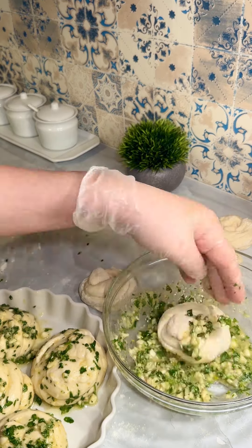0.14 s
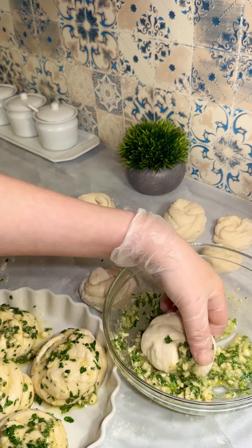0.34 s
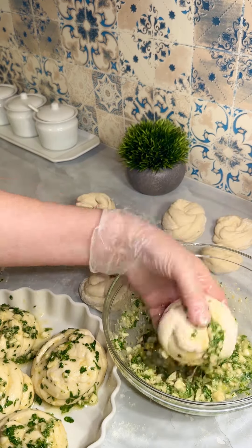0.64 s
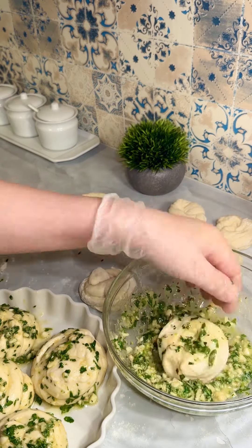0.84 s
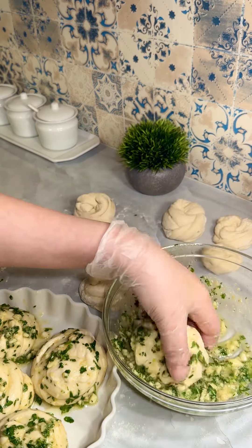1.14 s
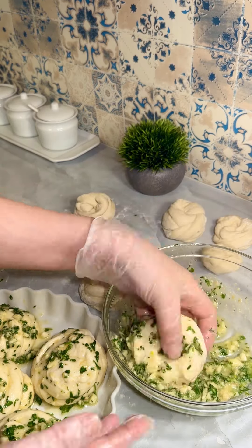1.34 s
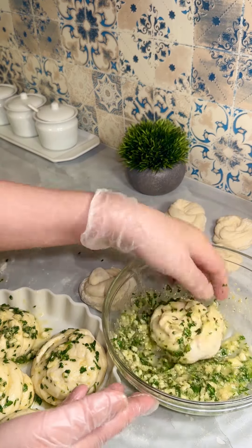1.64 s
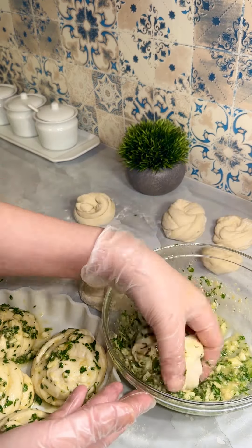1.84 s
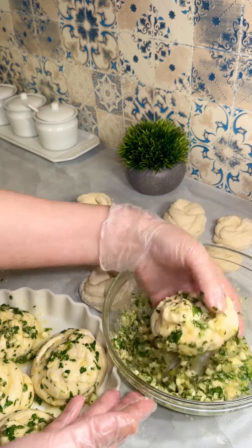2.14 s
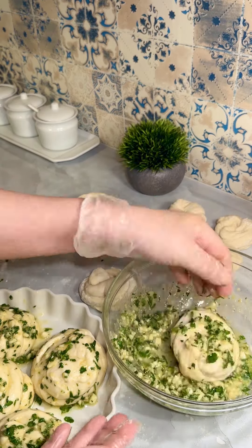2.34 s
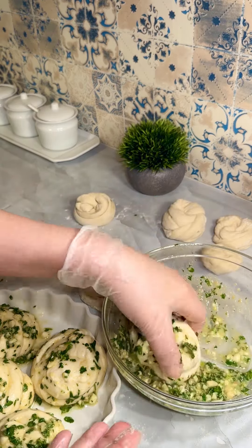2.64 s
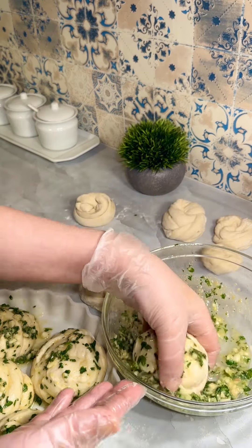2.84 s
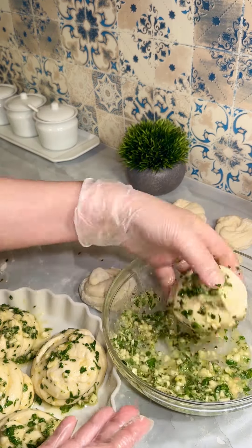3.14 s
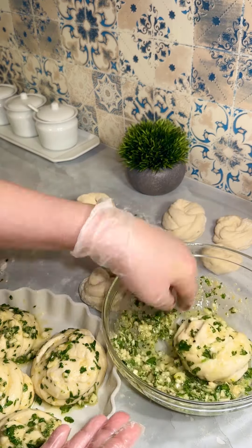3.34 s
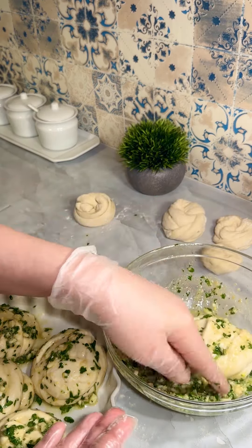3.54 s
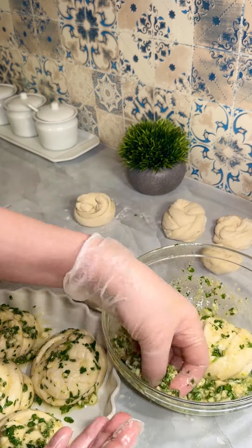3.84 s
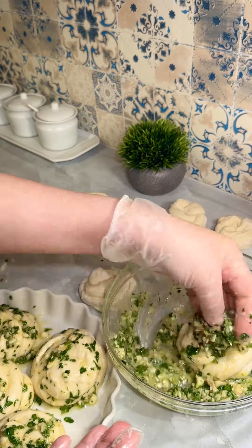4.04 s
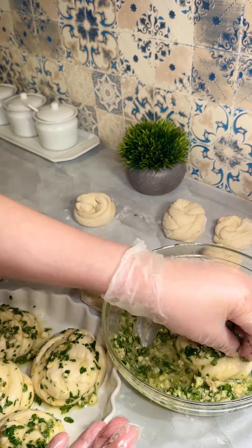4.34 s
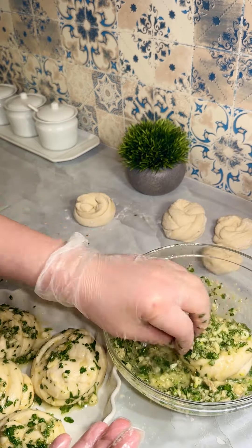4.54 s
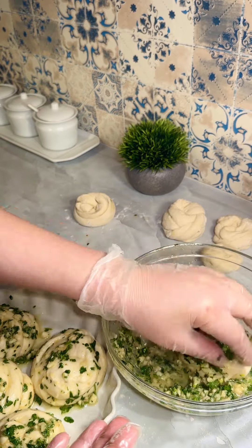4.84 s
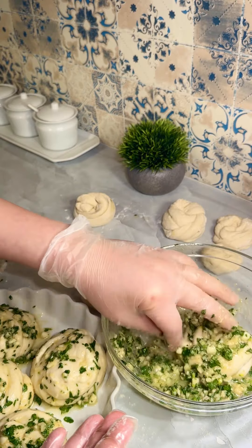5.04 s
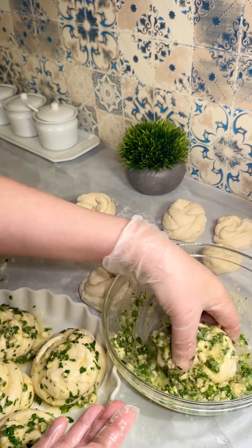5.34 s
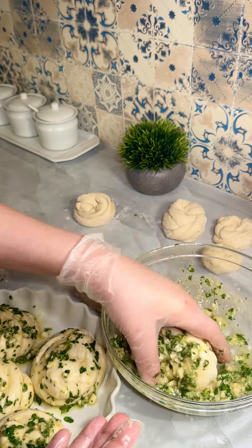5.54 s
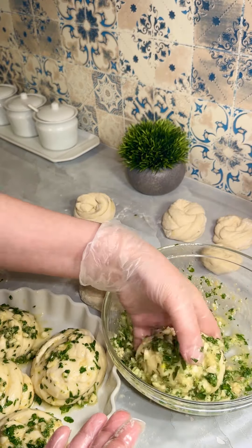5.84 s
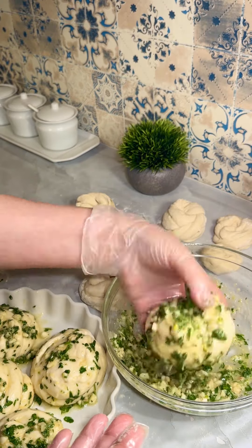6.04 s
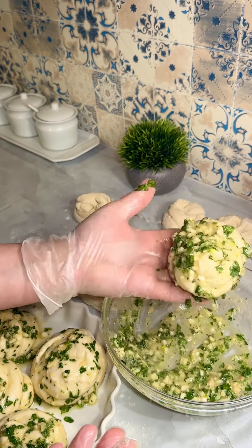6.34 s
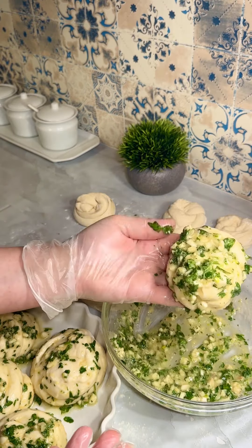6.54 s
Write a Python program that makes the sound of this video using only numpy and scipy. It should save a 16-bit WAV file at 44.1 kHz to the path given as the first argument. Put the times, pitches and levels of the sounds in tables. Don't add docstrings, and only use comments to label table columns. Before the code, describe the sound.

Close stereo sound in a quiet kitchen with very short reflections. From 0 s a thin glove rustles over fine wet crackle, a brief drag brushes the glass, and soft low thuds land around 0.3 s. Small oily snaps and ticks scatter throughout. A brighter crack comes at 0.8 s, then a dull touch and a thick smear near 1 s. Hollow knocks at 1.4 s lead into a sharp hissing air spit, and a hard wet slap cracks at 1.55 s. Another, longer spit comes at 2 s as the faint engine outside drones higher beneath the fridge hum. Strong slaps follow at 2.3 and 3.2 s. Activity then softens into squelchy presses, with a low smear near 4 s and long drags from 4.4 s. A knuckle raps the glass bowl at 5 s with a tiny bounce. Folds flick near 5.5 s, a last wet drag passes around 6 s, and sparse ticks and light brushing fade toward 6.7 s.

```python
import sys
import numpy as np
from scipy import signal
from scipy.fft import rfft, irfft, next_fast_len
from scipy.io import wavfile

SR = 44100
rng = np.random.default_rng(int(sys.argv[2]) if len(sys.argv) > 2 else 0)


def store_pcm(level_fs):
    pcm = np.round(np.clip(level_fs, -1, 1) * 32767).astype(np.int16)
    wavfile.write(sys.argv[1], SR, np.atleast_2d(pcm).T)


def boost_factor(decibels):
    exponent = np.asarray(decibels, float) / 20
    return 10 ** exponent


N = 295911

# frequency in Hz, lead of the left in radians, left minus right in dB.
PORT_DIFFERENCES = [(157, -0.16, 0), (503, 0.21, 0), (954, 1.03, 0.5), (1480, -1.4, 1.5), (1800, 0.37, 0),
                    (3400, 0.75, -0.2), (4810, 1.0, 0), (5650, 0.9, 2), (7000, 0.6, 0.3), (9500, 0.1, 1),
                    (12700, -1.25, 0), (15500, -2, 1)]
# frequency in Hz, correlation from -1 to 1.
LEFT_RIGHT_LIKENESS = [(60, 0.97), (290, 1), (640, 0.4), (1410, -1.03), (2300, 0.32), (3400, 0.8),
                       (4900, 0.77), (7000, 0.99), (9500, 0.47), (15000, 0.72)]

# frequency in Hz, density in dB per Hz.
RUMBLE_SPECTRUM = [(18, -80), (30, -51), (64, -19.5), (160, -13.5), (184, -12), (204, -11), (220, -27),
                   (300, -29.5), (390, -74), (660, -120)]
# time in seconds, level in dB.
RUMBLE_LEVELS = [(0.0, -69.5), (1.08, -66), (1.4, -69.5), (1.61, -61), (2.07, -69.5), (2.34, -62.5),
                 (4.22, -64), (4.39, -66), (6.71, -67)]
# frequency in Hz, level in dB, waver in dB.
FRIDGE_TONES = [(192.1, 1, 1.25), (111.7, -20, 3.5), (212, -15.5, 3), (647.5, -20, 2.5)]
# time in seconds, firing tone in Hz, level in dB.
ENGINE_COURSE = [(0, 44.1, -71), (1.85, 45.2, -99), (2.05, 57.4, -58), (2.6, 56.94, -57),
                 (3.3, 57.5, -55.5), (3.75, 55.45, -63.5), (4.0, 54.8, -54), (4.33, 57.8, -58),
                 (4.4, 61.3, -71.5), (4.65, 73.6, -62), (4.85, 82.4, -70.5), (5.0, 77.4, -99),
                 (5.5, 74.6, -85), (5.75, 76.4, -72.5), (6.71, 79.4, -74.5)]
# multiple of the firing tone, level in dB.
FIRING_ORDERS = [(1, -1), (2.0, -14.5), (2.5, -9)]

# peak in seconds, length in seconds, ringing in dB.
GLASS_RUBS = [
    (0.096, .07, -71),
    (2.218, 0.051, -70),
    (4.562, 0.08, -72),
    (5.012, 0.042, -61),
    (5.203, 0.023, -77),
    (5.544, 0.071, -79),
]
# frequency in Hz, level in dB.
GLASS_MODES = [(4107, 0), (6245, -16), (8839, -12), (7300, -14), (11601, -9), (14637, -18)]
# start in seconds, peak in dB, contact cut-off
# in Hz.
KNUCKLE_RAPS = [
    (5.029, -27, 1500),
    (5.0337, -32, 900),
    (5.057, -50, 700),
    (5.079, -53, 700),
    (.934, -46.5, 400),
    (1.0, -44.5, 600),
    (1.022, -57, 900),
]
# frequency in Hz, level in dB, 60 dB decay in seconds.
BOWL_MODES = [(400, -1.5, 0.09), (576, 4.5, 0.059), (632, 9, 0.038), (851, 1.5, 0.05), (1080, -5.5, 0.034),
              (1243, -9.5, 0.063), (1390, -7, 0.049), (1610, -4.5, 0.021), (2080, -6.5, 0.028),
              (2520, -23.5, 0.06)]

# peak in seconds, length in seconds, level in dB, low Hz, top Hz.
DOUGH_DRAGS = [
    (0.107, 0.11, -61, 1140, 5560),
    (2.222, 0.056, -59.5, 1210, 8000),
    (3.1, 0.21, -78, 2500, 4470),
    (3.15, 0.27, -76, 1000, 2200),
    (3.401, 0.33, -80.5, 2670, 4640),
    (4.45, 0.13, -70.5, 400, 4000),
    (4.56, 0.48, -69, 302, 3600),
    (4.69, 0.19, -80, 350, 3500),
    (5.96, 0.73, -71, 296, 4400),
]
GLOVE_BRUSHES = [(0.088, 0.12, -63, 6000, 14800), (0.294, 0.21, -63.5, 6000, 16000),
                 (1.25, 0.46, -72.5, 7200, 16000), (3.054, .06, -74, 11000, 16000),
                 (3.847, 0.12, -74.5, 2350, 5570), (4.15, 0.045, -71, 4500, 7000),
                 (4.297, 0.055, -74.5, 1200, 1870), (1.033, 0.22, -55.5, 400, 6100),
                 (1.477, 0.19, -54.5, 620, 750), (2.806, 0.19, -62.5, 4500, 13800),
                 (2.874, 0.1, -70.5, 3730, 6500), (5.295, 0.14, -72.5, 7000, 8800),
                 (0.116, 0.041, -64, 450, 1020), (0.775, 0.014, -58, 1500, 12000),
                 (1.553, .008, -55, 1500, 7000), (1.456, 0.063, -54.5, 1300, 3180),
                 (0.104, 0.088, -71, 3050, 4500), (2.939, 0.12, -73, 3630, 4640),
                 (0.935, 0.056, -73, 1500, 5000), (2.026, 0.077, -62, 1000, 3020),
                 (3.212, 0.0098, -50, 1500, 5000), (4.045, 0.17, -68.5, 110, 1150),
                 (4.514, 0.053, -67, 11650, 16100), (5.006, 0.12, -66, 1900, 15500),
                 (6.533, 0.12, -68.5, 11400, 16100), (6.608, 0.28, -72.5, 3860, 7170)]
# frequency in Hz, level in dB.
BOWL_AIR = [(382, 2), (570, 3), (935, -3), (1410, -5.5), (2200, -14), (3180, 2.5), (4150, -2.5), (7300, 4)]

# start in seconds, peak in dB, 60 dB decay in seconds, whistle edge in Hz.
AIR_SPITS = [
    (1.4428, -18, 0.17, 7600),
    (2.002, -19.5, 0.23, 9300),
]
# frequency in Hz, density in dB per Hz.
JET_SPECTRUM = [(1000, -18), (7000, -13), (8300, -11.5), (9600, -10), (10400, -2.5), (11300, -9),
                (12200, -1), (13300, -15.5), (16400, -12.5)]

# start in seconds, peak in dB, centre in Hz.
OIL_FILMS = [(0.257, -43, 6800), (0.311, -51, 6040), (0.347, -47, 3260), (0.3747, -50, 2550),
             (0.484, -50, 6720), (0.6266, -48, 2860), (1.123, -51, 2550), (1.178, -44, 3060),
             (1.657, -36.5, 6000), (1.756, -42.5, 6350), (1.795, -45, 3950), (1.851, -48, 3860),
             (2.0714, -35, 4800), (2.2643, -46, 6650), (2.5582, -49, 6100), (2.774, -39, 5770),
             (3.181, -54, 2980), (3.658, -53, 6230), (4.201, -52, 5680), (4.222, -47, 5060),
             (4.4357, -54, 6000), (5.25, -44.5, 5100), (5.335, -44, 4890), (5.542, -48.5, 4960),
             (5.872, -47, 3893), (6.097, -53, 5060), (6.185, -58, 5210), (6.489, -62.5, 4920)]
GLOVE_FOLDS = [(0.0646, -54, 8000), (0.271, -43, 8600), (0.3543, -46, 12000), (0.404, -51, 10400),
               (0.746, -50.5, 8900), (1.523, -49, 7450), (1.952, -49, 13900), (2.412, -43.5, 9960),
               (2.6277, -46.5, 12700), (3.028, -56, 9150), (3.405, -50, 7150), (3.503, -49, 9600),
               (2.795, -43, 9000), (2.808, -50, 10500), (4.6878, -53, 7300), (4.8478, -48.5, 13600),
               (5.4796, -44, 9500), (5.6072, -47, 11000), (5.628, -45, 10200), (5.699, -49.5, 11350),
               (6.049, -52, 10900), (6.38, -59, 12000)]
HERB_TICKS = [(0.0845, -59, 4190), (0.2029, -65, 3890), (0.2374, -54, 4160), (0.3007, -50, 4860),
              (0.621, -40, 8580), (0.9175, -48, 6250), (1.0086, -60, 3040), (1.025, -42, 3820),
              (1.039, -35.5, 4440), (2.1829, -68, 4255), (2.2103, -43.5, 7260), (2.5222, -51, 6260),
              (2.5376, -49, 8700), (2.6838, -54, 10230), (2.7844, -45, 10400), (2.8254, -49, 7860),
              (2.8656, -40, 4930), (2.952, -49, 5300), (3.037, -57, 6990), (3.059, -65, 2745),
              (3.179, -59, 3020), (3.3314, -50, 6270), (3.6263, -49, 8570), (3.7323, -55, 11540),
              (3.7698, -60, 4440), (3.86, -46, 4100), (3.8985, -66, 11300), (4.367, -45, 10370),
              (4.5032, -54.5, 3207), (4.9733, -53, 9640), (5.1422, -55, 6800), (5.163, -53, 5800),
              (5.238, -47, 6440), (5.3794, -65, 8020), (5.4006, -64, 11000), (5.421, -61, 6000),
              (5.5007, -46, 7040), (5.5757, -48, 11200), (5.5984, -52, 11800), (5.7242, -52.5, 3280),
              (5.9833, -53, 3170), (0.692, -54, 13360), (0.809, -39, 11000), (0.887, -58, 7000),
              (2.104, -50, 3630), (2.142, -54, 13500), (3.535, -51, 8000), (3.578, -60, 5000),
              (4.705, -55.5, 8300), (4.737, -58, 4300), (4.881, -61, 6100), (6.117, -55.5, 9000),
              (6.146, -59, 5070), (6.332, -60.5, 4000)]
# start in seconds, peak in dB, centre in Hz, width in octaves.
BROAD_CRACKS = [(0.572, -39, 6000, 2.7), (0.7801, -30.5, 8300, 4.1), (1.418, -42, 5500, 1.5),
                (1.4438, -22.5, 13000, 0.56), (1.5567, -20.5, 9030, 7.5), (1.5589, -22, 7900, 12),
                (1.68, -40, 8000, 3.4), (1.685, -35.5, 10700, 4), (2.294, -30.5, 5000, 8.1),
                (2.297, -19.5, 6100, 9.9), (3.204, -30.5, 4500, 4.0), (3.2139, -28.5, 3230, 1.8),
                (3.2163, -23, 3500, 3.6), (4.05, -56, 2840, 6.9), (4.158, -47.5, 10430, 1.6),
                (6.022, -44.5, 11220, 2.5), (6.2896, -38.5, 10370, 0.74), (6.291, -43, 4290, 0.78),
                (6.299, -48, 3500, 1.2), (6.32, -46.5, 5000, 2.8)]

# start in seconds, knock peak in dB,
# counter thump in dB, air pocket in Hz, share of the bowl base in dB.
LANDINGS = [(0.244, -56.5, -49, 493, 4), (0.27, -67, -45.5, 366, -3), (0.3, -71, -42, 350, 9),
            (0.655, -34.5, -51.5, 732, -14.5), (0.782, -44, -46, 730, -7), (0.925, -42.5, -33, 560, -11.5),
            (0.985, -38.5, -49, 335, -10), (1.014, -47, -42, 348, -8), (1.388, -28, -41, 647, -4.5),
            (1.402, -25.5, -73, 633, -7), (1.446, -36, -47.5, 622, -6), (1.69, -47, -37, 492, -8.5),
            (1.734, -52, -46.5, 400, -11), (1.854, -43.5, -47, 380, -16), (1.921, -48.5, -65, 566, -13.5),
            (2.005, -50, -70, 673, -3), (2.403, -56, -48, 464, -24), (2.525, -32.5, -44, 715, -13),
            (2.792, -64, -50.5, 477.2, -34), (5.236, -64, -49, 437, -5), (5.589, -50, -56, 656, -24),
            (0.657, -41.5, -76, 264, -35),
    (2.297, -29, -34, 781, -14.5),
    (1.5575, -28, -41, 913, -13.5),
    (3.218, -27, -37, 910, -17),
    (5.029, -29, -58, 606, -5),
    (5.033, -28.5, -40.5, 558, -33),
]
# frequency in Hz, level in dB, 60 dB decay in seconds.
COUNTER_MODES = [(135.2, -0.5, 0.16), (184.4, 9, 0.12)]
BASE_MODES = [(400, 6, 0.13), (601.5, -2, 0.26), (722, -5, 0.18), (882, -7.5, 0.042), (1172, 3, 0.088),
              (1200, -6, 0.07), (1720, -3, 0.013), (1950, -28, 0.079), (2550, -23, 0.12)]

# time in seconds, effort as glove rustle in dB, wetness as crackle over rustle in dB.
HAND_WORK = [(0.0, -80, 7), (0.6, -74.5, 2.5), (0.86, -81.5, 8), (1.0, -64.5, -24), (1.19, -80.5, 9.5),
             (1.55, -62, -10), (1.92, -81.5, 15.5), (2.1, -74.5, -12.5), (2.73, -77, -4.5),
             (3.48, -76, 1.5), (3.83, -80, 0), (4.2, -91, 3), (4.55, -78, -7), (4.84, -86.5, -1),
             (5.5, -72.5, 0), (5.94, -84, 2.5), (6.3, -80.5, -4), (6.71, -88, 3)]
# peak in seconds, length in seconds, smear in dB, squelch in dB.
DOUGH_PRESSES = [(0.339, 1, -64, -64.5), (1.04, 0.63, -51, -77), (1.45, 0.88, -64.5, -67),
                 (1.7, 0.15, -58, -69), (2.303, 0.88, -70, -63), (2.585, 1, -88, -76),
                 (3.204, 1, -60.5, -81), (4.058, 0.4, -55.5, -77), (4.208, 0.88, -90, -78),
                 (4.644, 1, -67.5, -86), (5.058, 0.34, -46, -109), (5.255, 0.96, -84, -77.5),
                 (5.51, 0.19, -69.5, -69.5), (5.995, 0.87, -62.5, -78), (6.53, 0.23, -84, -81.5)]
# frequency in Hz, density in dB per Hz.
SMEAR_SPECTRUM = [(140, -15), (230, 0.5), (257, -21.5), (406, -7.5), (815, -18), (1800, -27), (2340, -63),
                  (3960, -120)]
# frequency in Hz, density in dB per Hz.
CRACKLE_SPECTRUM = [(760, -22), (1300, -4), (2460, 1), (3660, -1.5), (4170, 6), (7500, -5.5), (9750, -68),
                    (16500, -120)]
# frequency in Hz, density in dB per Hz.
RUSTLE_SPECTRUM = [(3820, -40), (6500, -7), (9670, -2), (10500, -3), (11200, -15.5), (12200, 3),
                   (14000, -23.5), (15000, -4.5), (16200, -16)]


def rms_one(x):
    return x / np.sqrt(np.mean(x ** 2) + 1e-20)


def peak_one(x):
    return x / np.abs(x).max()


def in_time(rows):
    s, *columns = np.transpose(rows)
    return [np.interp(np.arange(N) / SR, s, c) for c in columns]


def at_hz(points, hz):
    points = np.array(points)
    return np.interp(np.log(hz), np.log(points[:, 0]), points[:, 1])


def filtered(x, order, hz, kind):
    return signal.sosfilt(signal.butter(order, hz, kind, fs=SR, output="sos"), x)


def drift(rate):
    r = np.exp(-80 * np.pi * rate / SR)
    slow = signal.lfilter([1], [1, -2 * r, r * r], rng.standard_normal(N // 40 + 2002))[2000:]
    return np.interp(np.arange(N) / 40, np.arange(len(slow)), rms_one(slow))


def swell(peak, length, rise):
    corners = [peak - rise * length, peak, peak + (1 - rise) * length]
    return np.interp(np.arange(N) / SR, corners, [0, 1, 0])


def ring(x, hz, t60):
    r, w = boost_factor(-60 / (t60 * SR)), 2 * np.pi * hz / SR
    return signal.lfilter([0, np.sin(w)], [1, -2 * r * np.cos(w), r * r], x + 1e-18)


def grainy(spectrum, patchy_db, grains_per_s, grain_db):
    audible = np.array([hz for hz, db in spectrum if db > -100])
    bottom, top = audible[0], audible[-1]
    edges = np.geomspace(bottom, top, int(3 * np.log2(top / bottom)) + 2)
    out, together, white = 0, drift(19.5), rng.standard_normal((2, 2, N))
    sizes = boost_factor(grain_db + 2.4 * np.minimum(rng.exponential(1, N), 3))
    bursts = signal.lfilter([1], [1, -.95], sizes * (rng.random(N) < grains_per_s / SR))
    for k, (low, high) in enumerate(zip(edges, edges[1:])):
        hz = np.sqrt(low * high)
        gain = boost_factor(at_hz(spectrum, hz) + patchy_db * (1.17 * together + drift(14.9)))
        burst = 1 + bursts * boost_factor(6.4 * drift(45) - 6.5)
        mid, side = filtered(white[k % 2] * burst, 2, [low, high], "band")
        alike = np.clip(at_hz(LEFT_RIGHT_LIKENESS, hz), -1, 1)
        out = out + gain * (np.sqrt(1 + alike) * mid + np.sqrt(1 - alike) * side * [[1], [-1]])
    return rms_one(out)


def from_side(x):
    return np.stack([x, np.roll(x, 13)])


def hiss():
    white = rng.standard_normal((3, N))
    white = white[:2] + 3.0 * white[2]
    wide = filtered(white, 1, 3000, "high")
    bump = filtered(white, 4, (8000, 11800), "band")
    return boost_factor(-94) * (rms_one(wide) + boost_factor(13) * rms_one(bump))


def room_rumble():
    level = boost_factor(in_time(RUMBLE_LEVELS)[0])
    return level * grainy(RUMBLE_SPECTRUM, patchy_db=2.2, grains_per_s=3., grain_db=-45)


def machines():
    turn = 2 * np.pi * np.arange(N) / SR
    hum = 0
    for hz, db, waver_db in FRIDGE_TONES:
        level = boost_factor(db + waver_db * (0.7 * drift(15) + 0.62 * drift(1.4)))
        hum = hum + level * np.sin(hz * turn + 0.08 * waver_db * drift(4))
    engine_hz, engine_db = in_time(ENGINE_COURSE)
    phase = 2 * np.pi * np.cumsum(engine_hz) / SR
    firing = sum(boost_factor(db) * np.sin(order * phase) for order, db in FIRING_ORDERS)
    engine = boost_factor(engine_db + drift(35)) * firing
    return np.sqrt(2) * (boost_factor(-61.5) * hum + engine)


def kitchen(x):
    t60_s, wall_cut_hz = 0.21, 3200
    size = next_fast_len(N + SR)
    w, spectrum = 2 * np.pi * np.fft.rfftfreq(size), rfft(x, size)
    dull = 1 / (1 + 1j * w * SR / (2 * np.pi * wall_cut_hz))
    out = np.zeros((2, len(w)), complex)
    for k, lag in enumerate(rng.uniform(0.0048, 0.029, 12) * SR):
        loop = boost_factor(-60 * lag / SR / t60_s) * dull * np.exp(-1j * w * lag)
        out[k % 2] += loop / (1 - loop) * (-1) ** (k // 2)
    return irfft(out * spectrum, size)[:, :N]


def rubbed_glass():
    friction = rng.standard_normal(N)
    rub = sum(boost_factor(db) * swell(s, length, 0.17) ** 0.3 for s, length, db in GLASS_RUBS)
    out = 0
    for hz, db in GLASS_MODES:
        t60 = 250 / hz
        out = out + boost_factor(db) * ring(friction * rub, hz, t60) / np.std(ring(friction, hz, t60))
    return out


def raps():
    clicks = np.zeros(N)
    for s, db, cut_hz in KNUCKLE_RAPS:
        touch = np.exp(-2 * np.pi * cut_hz * np.arange(400) / SR)
        i = round(s * SR)
        clicks[i:i + 400] += boost_factor(db) * touch / touch.sum()
    return sum(boost_factor(db - 5.0) * ring(clicks, hz, t60) * (-1) ** k
               for k, (hz, db, t60) in enumerate(BOWL_MODES))


def drags():
    out = np.zeros(N)
    raw = rng.standard_normal(N) * boost_factor(2.4 * drift(73))
    plain = rms_one(signal.lfilter([1], [1, -.7], raw))
    hollow = plain + .4 * sum(boost_factor(db) * rms_one(ring(raw, hz, .028)) for hz, db in BOWL_AIR)
    for friction, strokes in ((plain, GLOVE_BRUSHES), (hollow, DOUGH_DRAGS)):
        for peak, length, db, low_hz, top_hz in strokes:
            stroke = swell(peak, length, 0.37) ** 1.67
            on = stroke > 0
            rough = filtered(friction[on], 2, [low_hz, top_hz], "band")
            out[on] += boost_factor(db) * stroke[on] * rms_one(rough)
    return out


def spits():
    size = next_fast_len(N)
    time, out, hz = np.arange(N) / SR, 0, np.fft.rfftfreq(size, 1 / SR) + 1
    air = rfft(rng.standard_normal(N), size) * boost_factor(at_hz(JET_SPECTRUM, hz))
    for s, db, t60, edge_hz in AIR_SPITS:
        under_edge = boost_factor(-5 / (1 + (hz / edge_hz) ** 30))
        jet = irfft(air * under_edge, size)[:N] * boost_factor(1.7 * drift(150))
        age = np.maximum(time - s + 0.0015, 0)
        fall = 1.47 * boost_factor(-60 * age / 0.031) + 0.42 * boost_factor(-60 * age / t60)
        out = out + boost_factor(db - 13.0) * np.minimum(age / 0.0046, 1) * fall * rms_one(jet)
    return out


def snaps():
    out, span = np.zeros((2, N + SR)), np.arange(SR // 5) / SR
    rows = [(*row, 1, 0.007) for row in OIL_FILMS]
    rows += [(*row, 0.79, 0.0067) for row in GLOVE_FOLDS]
    rows += [(*row, 0.014) for row in BROAD_CRACKS]
    rows += [(s, db - 5, hz, 0.83, 0.0052) for s, db, hz in HERB_TICKS]
    noise = rng.standard_normal((len(rows), 2, len(span)))
    for (s, db, hz, octaves, t60), grit in zip(rows, noise):
        pair = grit[0] + 0.17 * grit[1] * [[1], [-1]]
        tail_db = -21.5 if db > -34 else -19
        tail = filtered(pair, 1, 20000, "low") * boost_factor(tail_db - 60 * span / 0.1)
        onset = np.minimum(span / (0.00087 + 0.083 * t60), 1) ** 2
        burst = (pair * boost_factor(-60 * span / t60) + tail) * onset
        if db < -30:
            burst[:, round((0.00074 + 0.092 * t60) * SR)] += 4.1
        band = np.clip(hz * 2 ** (octaves * np.array([-.5, .5])), 300, 14500)
        snap = filtered(burst, 2, band, "band") + boost_factor(-17.5) * burst
        i = round(s * SR) - 40
        out[:, i:i + len(span)] += boost_factor(db) * peak_one(snap)
    return out[:, :N]


def thuds():
    pocket_cycles, sag_share, sag_s, thump_lag_s = 9.3, 0.805, 0.0047, 0.0041
    out, span = np.zeros(N + SR), np.arange(SR // 3) / SR
    hits = LANDINGS
    luck = rng.normal(0, 1, (len(hits), len(BASE_MODES) + len(COUNTER_MODES)))
    noise = rng.standard_normal((len(hits), len(span)))
    push = span * np.exp(-span / 0.00064)
    for (s, knock_db, thump_db, pocket_hz, base_db), chance, grit in zip(hits, luck, noise):
        thump = sum(boost_factor(db + 2.0 * c) * ring(push, hz, t60)
                    for (hz, db, t60), c in zip(COUNTER_MODES, chance[::-1]))
        thump = filtered(thump, 3, [90, 240], "band")

        blow = span * np.exp(-span * pocket_hz * 11.6)
        pop = ring(blow, pocket_hz, pocket_cycles / pocket_hz)
        pop = ring(pop, pocket_hz, 0.0055)
        base = sum(boost_factor(db + 5.8 * c) * ring(blow, hz, t60)
                   for (hz, db, t60), c in zip(BASE_MODES, chance))
        squash = grit * np.exp(-span / 0.014) * np.minimum(span / 0.0018, 1)
        wet = filtered(squash, 2, [300, 1.5 * pocket_hz], "band")
        sunk = span + sag_share * sag_s * (1 - np.exp(-span / sag_s))
        sag = np.sin(2 * np.pi * 0.7975 * pocket_hz * sunk) * peak_one(span * np.exp(-span / 0.0031))
        pop = peak_one(pop) + boost_factor(-6.5) * sag
        knock = peak_one(pop) + boost_factor(base_db) * (peak_one(base) + boost_factor(4.0) * peak_one(wet))
        knock = filtered(knock, 2, [260, 2300], "band")

        i = round(s * SR)
        out[i:i + len(span)] += boost_factor(knock_db) * peak_one(knock)
        i += round(thump_lag_s * SR)
        out[i:i + len(span)] += boost_factor(thump_db + 4.5) * peak_one(thump)
    return out[:N]


def hand():
    effort_db, wet_db = in_time(HAND_WORK)
    smear, crackle = boost_factor(-75.5), boost_factor(effort_db + wet_db)
    for peak, length, smear_db, squelch_db in DOUGH_PRESSES:
        press = swell(peak, length, 0.49) ** 6.83
        smear = smear + boost_factor(smear_db) * press
        crackle = crackle + boost_factor(squelch_db) * press
    rustle = boost_factor(effort_db) + 0.4 * crackle
    out = smear * grainy(SMEAR_SPECTRUM, patchy_db=-0.5, grains_per_s=2.1, grain_db=-40)
    out += crackle * grainy(CRACKLE_SPECTRUM, patchy_db=3.0, grains_per_s=180.0, grain_db=-6.0)
    return out + rustle * grainy(RUSTLE_SPECTRUM, patchy_db=3.0, grains_per_s=150.0, grain_db=8.0)


def scene():
    background = hiss() + room_rumble() + from_side(machines())
    knocks, rubs = thuds() + raps(), drags()
    cracks = snaps() + spits()
    echo = boost_factor(-24.0) * kitchen(knocks + rubs) + boost_factor(-18.5) * kitchen(cracks.mean(axis=0))
    rubs = 0.5 * rubs + 0.65 * from_side(rubs)
    return background + echo + rubbed_glass() + rubs + cracks + knocks + hand()


def top_cut(x):
    return signal.sosfilt(signal.butter(12, 16660, fs=SR, output="sos"), x)


def record(dry):
    size = next_fast_len(N + 4096)
    hz, ports = np.fft.rfftfreq(size, 1 / SR) + 1, np.array(PORT_DIFFERENCES)
    half = boost_factor(at_hz(ports[:, [0, 2]], hz) / 2) * np.exp(.5j * at_hz(ports, hz))
    pair = irfft(rfft(dry, size) * [half, 1 / half], size)[:, :N]
    pair = filtered(pair, 4, 52, "high")
    mix = signal.sosfilt(signal.cheby2(14, 60, 16650, fs=SR, output="sos"), pair)
    return top_cut(mix)


dry = scene()
out = record(dry)
store_pcm(out)
```